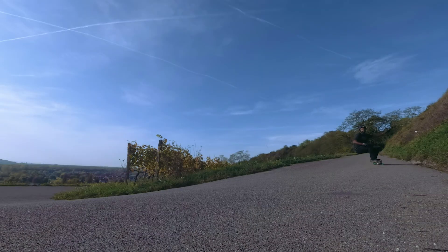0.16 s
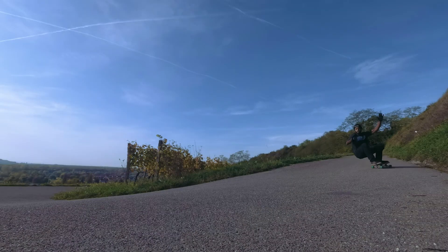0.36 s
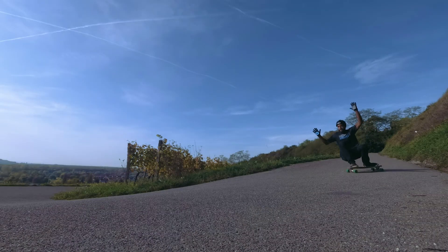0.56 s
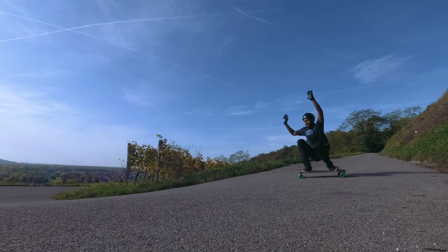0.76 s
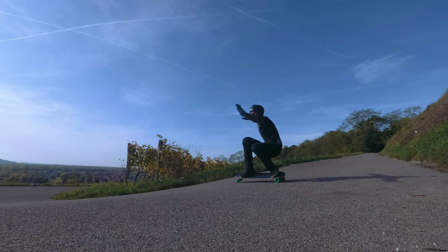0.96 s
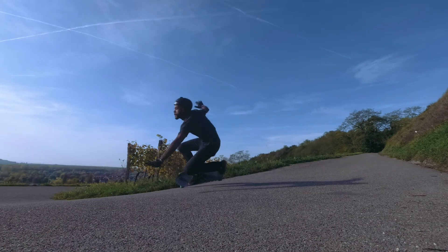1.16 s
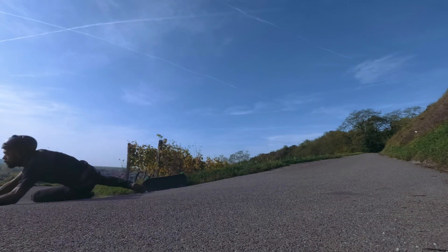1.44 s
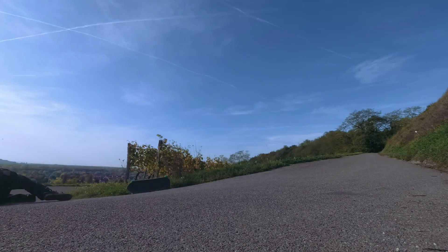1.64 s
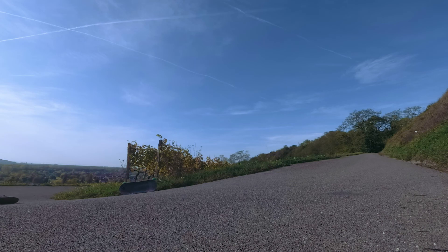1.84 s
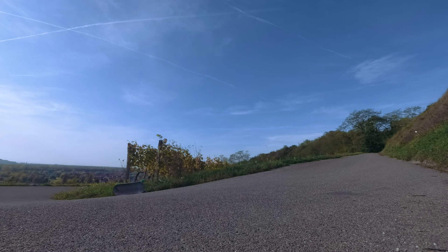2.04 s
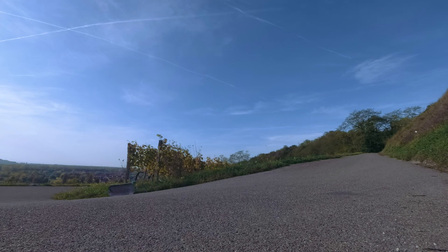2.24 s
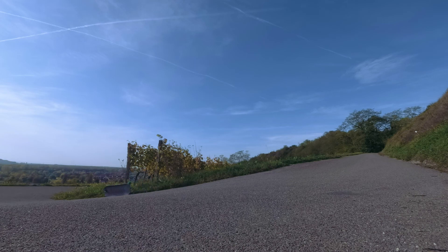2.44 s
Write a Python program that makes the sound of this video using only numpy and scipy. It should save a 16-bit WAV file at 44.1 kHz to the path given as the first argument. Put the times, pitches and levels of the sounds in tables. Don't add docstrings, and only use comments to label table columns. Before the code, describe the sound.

A longboard approaches on rough asphalt with a hollow deck hum and tyre hiss, chatters in a sideways slide, cuts off, then the rider lands with hard knocks and a fading gritty skid, outdoors, close low microphone.

```python
import sys
import numpy as np
from scipy import signal
from scipy.fft import rfft, irfft
from scipy.io import wavfile

SR = 44100
rng = np.random.default_rng(int(sys.argv[2]) if len(sys.argv) > 2 else 0)


def output_pcm(signal):
    pcm = np.clip(np.atleast_2d(signal).T, -1, 1) * 32767
    wavfile.write(sys.argv[1], SR, np.round(pcm).astype(np.int16))


def amplitude_ratio(level_db):
    exponent = np.asarray(level_db, float) / 20
    return 10 ** exponent


N = 114660
T = np.arange(N) / SR
HZ = np.fft.rfftfreq(N, 1 / SR)

# [f/Hz, density/dB]
RUMBLE = [(90, -15), (200, -3), (300, 1.5), (450, -5.5), (1200, -74)]


def evened(x):
    return x / np.sqrt(np.mean(x ** 2) + 1e-20)


def read(points):
    f, value = np.transpose(points)
    return np.interp(np.log(HZ + 1), np.log(f + 1), value)


def coloured(x, gain):
    return evened(irfft(rfft(x) * gain, N))


def noise():
    return rng.standard_normal((2, N))


def peaks(table):
    total = 0
    for k, (f, width, db) in enumerate(table):
        detune = (HZ / f - f / (HZ + 1)) * f / width
        total = total + (-1) ** k * amplitude_ratio(db) / (1 + 1j * detune) ** 2
    return total


def lumps(per_s, depth_db):
    wobble = coloured(rng.standard_normal(N), np.exp(-(HZ / per_s) ** 2))
    return amplitude_ratio(depth_db * wobble)


def rubbing(per_s, spread_db, grain_s, bed_db):
    hit = rng.random(N) < per_s / SR
    size = amplitude_ratio(spread_db * np.minimum(rng.exponential(1, N), 3.5))
    grains = signal.lfilter([1], [1, -np.exp(-1 / (grain_s * SR))], hit * size)
    return (evened(grains) + amplitude_ratio(bed_db)) * noise()


def level(table, *columns):
    rows = np.array(table)
    total_db = rows[:, list(columns)].sum(1)
    return amplitude_ratio(np.interp(T, rows[:, 0], total_db, left=-120, right=-120))


def ports(x, same, lead, pan):
    a, b = rfft(x)
    likeness = np.clip(read(same), 0, 1)
    half_turn = np.exp(.5j * read(lead))
    half_pan = amplitude_ratio(read(pan) / 2)
    left = (likeness * a + np.sqrt(1 - likeness ** 2) * b) * half_turn * half_pan
    right = a / half_turn / half_pan
    return irfft(np.array([left, right]), N)


def open_air():
    # [f/Hz, density/dB]
    air = [(145, -15.5), (1280, -6), (2410, -18.5), (9460, -24.5), (16000, -35)]
    return amplitude_ratio(-56.5) * coloured(noise(), amplitude_ratio(read(air)))


def wind():
    # [f/Hz, width/Hz, level/dB]
    flutter = [(93, 70, 0)]
    # [t/s, level/dB]
    gusts = [
        (0, -69),
        (.35, -64),
        (.8, -83),
        (1.8, -62.5),
        (2.6, -97),
    ]
    return coloured(noise() * lumps(7.4, depth_db=3.5), peaks(flutter)) * level(gusts, 1)


def stones():
    # [t/s, peak/dB, ring f/Hz]
    bumps = [(.312, -28, 474), (0.375, -29, 466), (.46, -23, 478), (0.511, -34, 490), (0.547, -28, 507),
             (.663, -22.5, 807), (.685, -20.5, 796), (.765, -22, 626), (.805, -24, 484), (.841, -35, 494),
             (1.013, -38, 704), (1.096, -26.5, 936), (1.285, -20.5, 844), (1.324, -23, 450),
             (1.369, -15, 1072), (1.671, -28.5, 885), (1.722, -16, 2320), (1.738, -15, 2320),
             (1.822, -19.5, 2000)]
    # [t/s, peak/dB, centre f/Hz]
    ticks = [(.6325, -34, 3110), (.6565, -45, 3570), (.6744, -37, 3300), (.7313, -46, 2930),
             (.7443, -39, 2600), (.752, -49, 3020), (.7637, -29, 3420), (.766, -40, 6850),
             (.7927, -33, 3620), (.9373, -48, 3170), (.9568, -33.5, 2810), (.9777, -34.5, 2630),
             (.992, -36, 3600), (1.096, -45, 6500), (1.3, -28, 2400), (1.316, -18, 2990),
             (1.8381, -40, 10500), (1.9593, -42, 9900), (2.0107, -38, 7450), (2.011, -43, 10300),
             (2.0491, -39.5, 10350), (2.1444, -41.5, 10600), (2.4731, -49, 9030)]
    bump_cycles, bump_rise_s = 4.5, 0.00067
    tick_s, tick_width_hz = 0.0023, 900
    out, t = np.zeros((2, N + 4000)), np.arange(4000) / SR
    for s, db, hz in bumps:
        envelope = np.exp(-t * hz / bump_cycles) * (1 - np.exp(-t / bump_rise_s))
        out[0, round(s * SR):][:4000] += amplitude_ratio(db) * np.sin(2 * np.pi * hz * t) * envelope
    for s, db, hz in ticks:
        r = np.exp(-np.pi * tick_width_hz * np.sqrt(hz / 3000) / SR)
        real, imaginary = rng.standard_normal((2, 2, 4000))
        puff = signal.lfilter([1], [1, -2 * r, r * r], real + 1j * imaginary)
        puff = evened((puff * np.exp(2j * np.pi * hz * t)).real)
        envelope = t / tick_s * np.exp(1 - t / tick_s) / 2
        out[:, round(s * SR):][:, :4000] += amplitude_ratio(db) * puff * envelope
    return out[:, :N]


def roll():
    # [t/s, deck hum/dB, then dB re hum: wheel chatter, rumble, upper deck modes]
    ride = [(0, -48, -33, -15.5, -0.5), (.34, -36.5, -35, -25, -2), (.55, -32, -18, -25, -5),
            (.62, -34, -9, -14.5, -2), (.68, -35.5, -7.5, -16, -0.5), (.77, -33.5, -6, -8.5, 0),
            (.84, -35.5, -6.5, -18, 1), (.95, -35.5, -8, -10.5, -2), (1.015, -39, -9.5, -8, 5),
            (1.03, -41, -8.5, -16, 6), (1.085, -47, -2, -9, 5), (1.1, -47, 1, -10, 10.5),
            (1.108, -51, -11, -8, -1)]
    hop = [
        (1.108, -50, -25, -8, -2),
        (1.127, -46.5, -25, -6, -1),
        (1.139, -60, -26, 2, -2),
        (1.148, -44, -30, -1, 3.5),
        (1.167, -51, -30, -7, 8),
        (1.173, -63, -32, 13.5, 9),
        (1.235, -60, -25, -1, 7.5),
        (1.281, -57, -28, -4, 0),
    ]
    # [f/Hz, width/Hz, level/dB]
    deck = [(488.5, 136, 2), (392, 65, -13)]
    upper_modes = [(721, 270, 2.5), (1036, 244, 0), (1393, 450, -2.5)]
    verge = [(1695, 350, 0)]
    # [f/Hz, density/dB]
    tyre_hiss = [(1200, -29), (1900, 3), (3700, -1.5), (5300, -0.5), (7600, -1), (11000, -7.5),
                 (15500, -4.5)]
    chatter_grit = [(880, -52), (1500, 1), (2300, -1.5), (3590, -3.5), (4600, -3), (6500, -11.5),
                    (9000, -30), (16000, -48)]
    sideways_scrub = [(1500, -32), (2500, -18), (5300, -21), (7200, 0), (10300, -6), (12500, -11),
                      (14000, -1), (16000, -3.5)]

    shaking = rubbing(per_s=260, spread_db=-2.5, grain_s=0.0018, bed_db=7.0) * lumps(31, depth_db=1.0)
    hum = coloured(shaking, peaks(deck))
    tipping = np.clip((T - 1) / 0.077, 0, 1)
    upper = coloured(shaking, peaks(upper_modes)) + amplitude_ratio(-8.5) * coloured(shaking, peaks(verge)) * tipping
    tyre = coloured(noise() * lumps(41, depth_db=.6), amplitude_ratio(read(tyre_hiss)))

    chatter_per_s, chatter_jitter = 95, 0.19
    rate = chatter_per_s * np.exp(chatter_jitter * np.log(lumps(45, depth_db=14.0)))
    turns = np.cumsum(rate) / SR
    slips = .6 + np.exp(-(turns % 1) / .3) * lumps(70, depth_db=3.5)
    grit = coloured(slips * noise(), amplitude_ratio(read(chatter_grit)))
    scrub = coloured(noise() * lumps(74, depth_db=2.0), amplitude_ratio(read(sideways_scrub)))
    low = coloured(noise() * lumps(22, depth_db=1.5), amplitude_ratio(read(RUMBLE)))

    path = ride + hop[1:]
    out = (hum + amplitude_ratio(-14.5) * tyre) * level(path, 1)
    out = out + low * level(path, 1, 3)
    out = out - upper * level(path, 1, 4)
    return out + (grit + amplitude_ratio(-1.5) * scrub) * level(path, 1, 2)


def knocks():
    # [t/s, peak/dB, ring f/Hz, crack/dB re ring]
    hits = [(.605, -18.5, 470, -23), (.7, -16, 544, -17), (.7635, -20, 503, -12), (.774, -23.5, 520, -4),
            (1.093, -25.5, 940, -12), (1.212, -51, 1270, -3), (1.2325, -32, 1540, -21),
            (1.281, -26.5, 782, -7), (1.302, -14.5, 687, -14.5), (1.441, -23.5, 1210, -4),
            (1.444, -13.5, 900, 0), (1.463, -14, 790, -22), (1.519, -8.5, 2170, -33),
            (1.5705, -13, 1210, -22), (1.575, -18.5, 975, -20), (1.702, -17.5, 970, -3),
            (1.95, -28.5, 570, -20), (2.054, -20.5, 2300, -20), (2.278, -20, 2290, -27)]
    # [t/s, peak/dB, f/Hz]
    thuds = [
        (1.175, -58, 70.4),
        (1.19, -47, 153),
        (1.264, -52, 160),
        (1.435, -50, 65),
        (1.442, -44, 263),
        (1.699, -45, 168),
    ]
    ring_cycles, ring_rise_s, crack_s, thud_cycles = 3.4, 0.0005, .0022, 2.1
    out, t = np.zeros((2, N + 4000)), np.arange(4000) / SR
    for s, db, hz, crack_db in hits:
        envelope = np.exp(-t * hz / ring_cycles) * (1 - np.exp(-(t / ring_rise_s) ** 2))
        ring = np.sin(2 * np.pi * hz * t) * envelope * np.array([[1], [0]])
        crack = signal.lfilter([.45, 0, -.45], [1, -1.2, .32], rng.standard_normal((2, 4000)))
        crack = crack * np.exp(-t / crack_s)
        out[:, round(s * SR):][:, :4000] += amplitude_ratio(db) * (ring + amplitude_ratio(crack_db) * crack)
    for s, db, hz in thuds:
        u = t * hz / thud_cycles
        out[0, round(s * SR):][:4000] += amplitude_ratio(db) * np.sin(2 * np.pi * hz * t) * 9.3 * u * np.exp(-2 * u)
    return out[:, :N]


def skid():
    # [t/s, body/dB, glove scrape/dB re body, fizz/dB re body]
    landing = [
        (1.2785, -25.5, -1, 1),
        (1.2805, -38.5, 4.5, -0.5),
        (1.31, -22, -3.5, -11),
        (1.349, -32.5, 2.5, 0.5),
        (1.38, -29, 1, -9.5),
        (1.47, -26, -7, -12),
        (1.53, -29.5, 2, -7.5),
        (1.567, -28.5, 0.5, -13),
        (1.61, -34.5, 5, -7),
    ]
    slide = [
        (1.65, -33.5, 0.5, -11.5),
        (1.71, -37, 1.5, -5.5),
        (1.75, -36.5, 5, -11),
        (1.92, -40, -3.5, -11),
        (1.96, -36.5, -2.5, -14.5),
        (2.06, -40.5, 3.5, -7),
        (2.11, -40.5, -5, -12),
        (2.2, -44.5, -1.5, -9.5),
    ]
    drag = [
        (2.225, -43.5, 1.8, -12),
        (2.28, -42, 1.7, -13.5),
        (2.35, -47, 7.3, -13),
        (2.375, -51.5, 7.2, -8),
        (2.46, -54, 6.8, -11),
        (2.48, -54, 10.6, -3),
        (2.54, -51, 5.1, -16),
        (2.6, -66, 3, -18),
    ]
    # [f/Hz, width/Hz, level/dB]
    body_modes = [(590, 517, 1.5), (850, 450, 1.5), (1285, 880, 3)]
    glove_modes = [(1634, 290, -3.5), (2223, 830, 3), (3686, 1040, -4.5)]
    # [f/Hz, density/dB]
    cloth_fizz = [(2650, -11), (4500, 0), (6630, -8), (8420, -2), (10700, -7.5), (12500, -41), (14000, -7),
                  (16000, -16)]

    slip = lumps(26, depth_db=1.9)
    body = rubbing(per_s=1200, spread_db=-2.0, grain_s=0.01, bed_db=17.0) * slip
    body = coloured(body, peaks(body_modes))
    glove = rubbing(per_s=600, spread_db=0.0, grain_s=0.0022, bed_db=1.0) * slip
    glove = coloured(glove, peaks(glove_modes))
    fizz = rubbing(per_s=200, spread_db=1.5, grain_s=0.00096, bed_db=13.5) * lumps(30, depth_db=1.0)
    fizz = coloured(fizz, amplitude_ratio(read(cloth_fizz)))
    low = coloured(noise() * lumps(24, depth_db=-0.5), amplitude_ratio(read(RUMBLE)))

    path = landing + slide + drag
    out = (body + amplitude_ratio(-18.5) * low) * level(path, 1)
    return out + glove * level(path, 1, 2) + fizz * level(path, 1, 3)


def scene():
    # [f/Hz, likeness 0..1]
    roll_same = [(30, 0.6), (130, 1), (1200, 1), (1800, .97), (3000, .9), (4450, 0.985), (7300, 0.65),
                 (15000, .4)]
    skid_same = [(30, 0.83), (130, 1), (300, .998), (1400, 1), (3200, 0.74), (5200, 0.38), (8000, 0.28),
                 (15000, 0.15)]
    # [f/Hz, lead/rad]
    roll_lead = [(700, 0), (1380, .3), (1800, 3.14), (2670, 5.8), (4020, 7.2), (4400, 9.42), (4800, 11.5),
                 (7400, 15.7), (15000, 27)]
    skid_lead = [(300, 0.047), (1460, 0.45), (2580, 1.85), (3530, 2), (5200, 4.05), (6500, 4.7),
                 (8440, 7.5), (15000, 13.2)]
    # [f/Hz, balance/dB]
    roll_pan = [(900, 0), (1550, 4), (1800, 0), (2400, -8), (4400, 0), (5200, -3), (8000, 1), (11000, -4.5)]
    skid_pan = [(400, -0.4), (1200, -2), (2100, -7.5), (3000, -1), (6000, -3.5), (7800, 2.5), (10500, -8.5)]

    x = open_air() + wind() + stones() + roll() + knocks() + skid()
    near = .5 + .5 * np.tanh((T - .86) / .05)
    past = .5 + .5 * np.tanh((T - 1.277) / .002)
    near_lead = [(hz / .9, rad) for hz, rad in roll_lead]
    approaching = ports(x * (1 - near), roll_same, roll_lead, roll_pan)
    level_with = ports(x * (near - past), roll_same, near_lead, roll_pan)
    leaving = ports(x * past, skid_same, skid_lead, skid_pan)
    return approaching + level_with + leaving


def top_cut(x):
    return signal.sosfilt(signal.butter(12, 16750, fs=SR, output="sos"), x)


def record(dry):
    # [f/Hz, gain/dB]
    colour = [(40, -13.5), (200, 0.5), (11300, 0.5), (11800, -10), (12000, -50), (13200, -50), (13400, -16),
              (14200, -7)]
    # [f/Hz, level/dB]
    whine_tones = [(13098, -84), (13151, -80)]
    whine = sum(amplitude_ratio(db) * np.sin(2 * np.pi * hz * T) for hz, db in whine_tones)
    whine = whine * np.array([[.05], [2.8]])
    heard = irfft(rfft(dry) * amplitude_ratio(read(colour)) * (HZ < 15900), N)
    return top_cut(heard + whine)


dry = scene()
out = record(dry)
output_pcm(out)
```